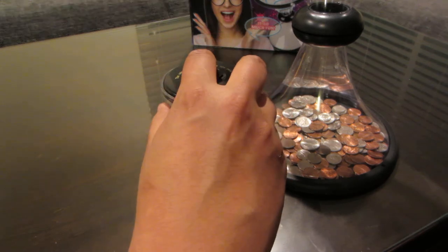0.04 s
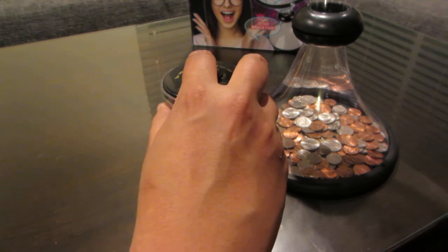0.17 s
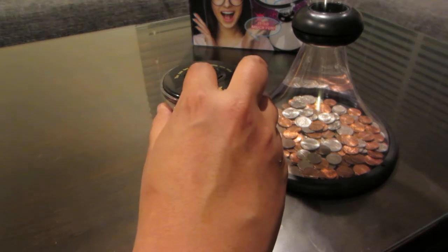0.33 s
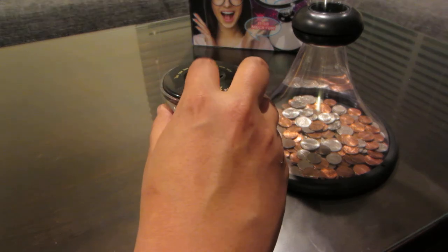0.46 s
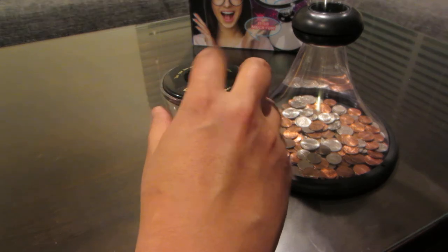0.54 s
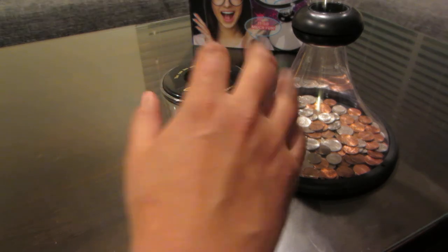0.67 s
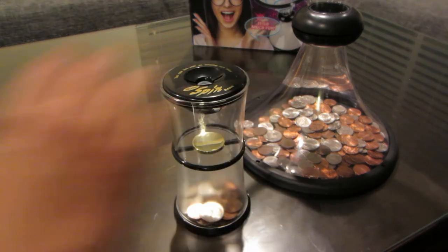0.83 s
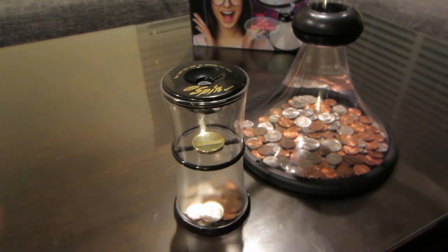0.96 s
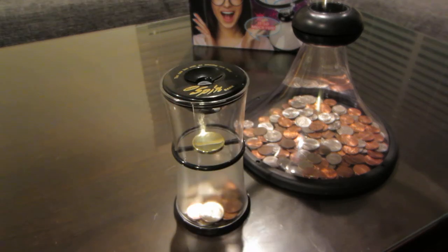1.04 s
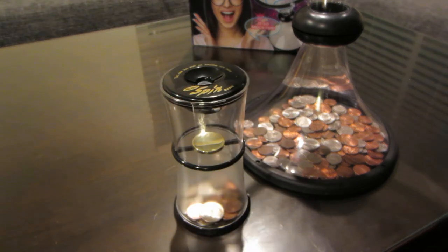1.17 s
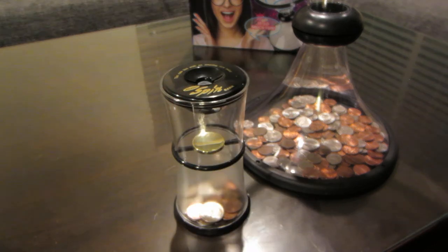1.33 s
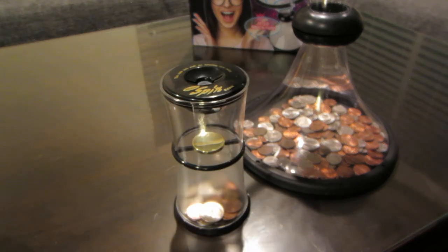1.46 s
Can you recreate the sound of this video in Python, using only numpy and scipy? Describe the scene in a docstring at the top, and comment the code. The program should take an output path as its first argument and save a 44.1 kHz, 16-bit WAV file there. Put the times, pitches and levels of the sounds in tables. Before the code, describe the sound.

A coin clacks through the tight slot of a small plastic bank. After a faint rub of a hand, sharp clacks, clinks, tiny squeaks and scrapes run from about 0.2 to 0.7 seconds, loudest between 0.3 and 0.5, with one soft table thump. The hand lets go near 0.6. From 1.2 to 1.5 seconds the spinning coin ticks faintly on the wall, over a low room hum.

```python
"""A table in a quiet, fairly live room. A coin is pressed through the lid of a small plastic bank.
It clacks on the shell, ringing its modes, clinks and stick-slip squeaks in the tight slot, and
scrapes along the plastic; one clack thumps the table. It spins on inside, ticking on the wall.
Behind: the hand rubbing and leaving the lid, room tone, hum and a short diffuse tail."""
import sys
import numpy as np
from scipy import signal
from scipy.fft import rfft, irfft, next_fast_len
from scipy.io import wavfile
from scipy.ndimage import map_coordinates

SR = 44100
rng = np.random.default_rng(int(sys.argv[2]) if len(sys.argv) > 2 else 0)


def persist_wave(psi):
    """Save psi, clipped to +-1, as 16-bit WAV."""
    counts = np.round(np.clip(psi, -1, 1) * 32767).astype(np.int16)
    wavfile.write(sys.argv[1], SR, np.atleast_2d(counts).T)


N = 66150
T = np.arange(N) / SR

# Coin blows on the shell: start_s, ring_db, tilt_db_per_octave, crack_db, knock_db, crack_t60_s
CLACK_HITS = [(.2296, -40, -11.5, -51, -37, 0.043), (0.2411, -33, -10, -32.5, -31.5, 0.058),
              (0.3058, -24, -2.5, -21.5, -50, 0.039), (0.3079, -14.5, -2, -10.5, -27, 0.011),
              (0.3097, -14, 1, -24, -25.5, 0.0055), (0.3181, -25.5, -4.5, -22, -27, 0.0086),
              (0.3719, -21.5, 0, -17, -45, .02), (0.3799, -17.5, 3.5, -19, -37, .016),
              (.3902, -26.5, -6, -27, -28.5, 0.026), (0.432, -21.5, 3.5, -26, -42.5, 0.0249),
              (0.4647, -25.5, -3.5, -21.5, -44, 0.018), (.4730, -17.5, -1, -12, -25, 0.014),
              (.4748, -23, 8.5, -10, -29, 0.0079), (0.4892, -21.5, 4, -37, -31.5, .0084),
              (.5717, -23.5, 3, -23.5, -28, 0.032), (0.5921, -22, 6.5, -24.5, -32.5, 0.029),
              (.6570, -28, -2.5, -32, -36.5, 0.014)]
# Coin edge on the slot: start_s, level_db
CLINK_HITS = [(0.369, -9), (.3798, -12.5), (.4316, -28.5), (0.474, -15.5)]
# Stick-slip bursts: start_s, length_s, pitch_hz, glide_percent, level_db, octave_db, roughness
SQUEAK_BURSTS = [(0.239, 0.017, 1325, -2.5, -25, -11, 0.34), (0.2559, 0.012, 1403, 3.5, -15, -14, 0.23),
                 (0.266, 0.0098, 2440, 2.5, -15.5, -23.5, 0.37), (.254, 0.022, 2160, 2.5, -27, -29.5, 0.83),
                 (.271, 0.013, 1452, -2.5, -29.5, -27.5, 0.1), (.284, .012, 1430, -0.5, -28, -31, .2),
                 (0.4722, 0.011, 1216, -0.5, -20, -15, 0.2), (0.54, 0.029, 1204, 2.5, -28.5, -18, 0.28),
                 (0.575, .026, 1190, 2.5, -26.5, -39, 0.3)]
# Coin sliding on plastic: start_s, length_s, level_db
SCRAPE_STROKES = [(0.255, 0.019, -22.5), (0.313, 0.012, -27.5), (0.391, 0.022, -32), (0.497, 0.035, -33),
                  (0.521, .075, -32), (0.599, 0.044, -36)]
# Spinning coin on the wall: start_s, hiss_db, ping_db, hiss_t60_s
TICK_GRAZES = [(1.177, -42, -50, 0.047), (1.191, -48.5, -50.5, 0.15), (1.274, -53.5, -51, 0.055),
               (1.286, -62, -49, 0.12), (1.316, -42, -44.5, 0.073), (1.3352, -36, -52, 0.049),
               (1.449, -52.5, -53, 0.21), (1.468, -53.5, -48, 0.28)]
# Modes of shell, hollow base, slot and wall: freq_hz, level_db, t60_s
SHELL_MODES = [(924, -7, 0.02), (1307, -7, 0.05), (1461, -5, 0.036), (1632, -0.5, 0.019),
               (2140, -0.5, 0.024), (2680, 1, 0.01), (2970, -4.5, 0.04), (3399, -5.5, 0.044),
               (4820, -8, 0.022), (6040, -6, 0.012)]
BASE_MODES = [(211, -10, 0.062), (420, -4.5, 0.024), (554, -1.5, .035), (883, -1, 0.032),
              (1138, 0.5, 0.034)]
SLOT_MODES = [(2545, -2.5, 0.015), (4817, -0.5, 0.012), (8200, -11.5, .007), (11000, -7, 0.0045)]
WALL_MODES = [(2364, -3, 0.044), (2528, 1, 0.064), (2710, -4, .05), (3300, -8, 0.035)]
# Noise spectra of coin, hand and room: freq_hz, density_db
CRACK_SPECTRUM = [(300, -21.5), (1200, -1), (2500, -0.5), (4100, -1), (5000, 0), (7000, -1), (9200, -5.5),
                  (13500, -10), (15700, -14)]
SCRAPE_SPECTRUM = [(35, -31), (200, -6), (600, -1), (1300, 0.5), (2600, 2), (4100, -4.5), (5200, -3),
                   (9500, -6), (13200, -17.5), (16000, -18)]
TICK_SPECTRUM = [(600, -8), (1800, 2.5), (3400, 3), (4400, -4.5), (6500, 3), (9000, -6.5), (13300, -17.5),
                 (16000, -14)]
RUB_SPECTRUM = [(100, -16), (350, 7), (600, -3), (2400, -14), (4000, -27), (14000, -35)]
LET_GO_SPECTRUM = [(70, -16), (160, -13), (245, 2.5), (340, -19), (600, -16), (1200, -30), (5000, -80)]
ROOM_TONE_SPECTRUM = [(25, -6), (90, -6.5), (135, -5), (190, -4.5), (310, -8), (850, -11.5), (1300, -16.5),
                      (5000, -29), (9300, -37), (16000, -45)]
# Hand shifting on the lid: time_s, level_db
RUB_ENVELOPE = [(0, -47), (.08, -52), (.16, -58.5), (.23, -49.5)]
# Room hum and faint whine: freq_hz, level_db
HUM_TONES = [(120, -64.5), (156, -65.5), (325, -69.5), (3435, -84)]
# Room decay: freq_hz, t60_s
TAIL_DECAY = [(150, 0.12), (600, 0.17), (2000, 0.328), (6000, 0.38), (10000, 0.19), (13000, 0.2754)]
# Room colour: freq_hz, gain_db
TAIL_COLOUR = [(100, 5.5), (220, 3), (500, 3.5), (1400, 2), (3000, -3.5), (7000, -5.5), (14000, -2)]
# Microphone treble dips: freq_hz, gain_db
MIC_RESPONSE = [(9500, -1), (10800, -7.5), (11800, -17.5), (13300, -3.5), (14800, -12.5), (15700, -10.5)]

STRIKE_ATTACK_S, SOFT_ATTACK_S = 0.000072, 0.002
STRIKE_DETUNE = 0.0017
LN_1000 = np.log(1000)  # 60 dB of decay


def clacks():
    """Each blow snaps, rings the shell, and adds a bright crack and a low knock through the base."""
    blows, impulses = np.zeros(N + SR), np.zeros(N)
    t = np.arange(SR // 10) / SR
    attack = 1 - np.exp(-t / STRIKE_ATTACK_S)
    crack = noise(CRACK_SPECTRUM)
    hz, mode_db, mode_t60_s = np.transpose(SHELL_MODES)[:, :, None]
    for start_s, ring_db, tilt_db, crack_db, knock_db, crack_t60_s in CLACK_HITS:
        spread, tune, polarity = rng.standard_normal((3, len(SHELL_MODES), 1))
        gain = np.sign(polarity) * amp(mode_db + tilt_db * np.log2(hz / hz.mean()) - 1.5 * spread)
        contact_t60_s = 3.14 * crack_t60_s  # a damped blow also shortens the ring
        decay = np.exp(-LN_1000 * t * (1 / mode_t60_s + 1 / contact_t60_s))
        modes = gain * decay * np.cos(2 * np.pi * hz * (1 + STRIKE_DETUNE * tune) * t)
        blows[round(start_s * SR):][:len(t)] += amp(ring_db) * modes.sum(0) * attack
        blows[:N] += amp(crack_db) * crack * fade(start_s, STRIKE_ATTACK_S, crack_t60_s)
        blows[:N] += amp(knock_db) * ring(BASE_MODES, start_s)
        impulses[round((start_s + STRIKE_ATTACK_S) * SR)] = amp(crack_db + 1)
    snaps = filtered(impulses, lambda hz: amp(along(CRACK_SPECTRUM, hz)))
    low_cut = signal.butter(2, 149, "high", fs=SR, output="sos")  # a small shell radiates little bass
    return signal.sosfilt(low_cut, blows[:N] + snaps)


def clinks():
    """The coin's edge strikes the slot and rings its modes."""
    return sum(amp(db) * ring(SLOT_MODES, start_s) for start_s, db in CLINK_HITS)


def squeaks():
    """Stick-slip in the slot: short gliding tones lock onto one resonance after another."""
    out = np.zeros(N)
    jitter, swell_db = 0.072 * wobble(rate_hz=600), 3 * wobble(rate_hz=250)
    for start_s, length_s, pitch_hz, glide_percent, db, octave_db, roughness in SQUEAK_BURSTS:
        glide = glide_percent / 100 * np.clip((T - start_s) / length_s, 0, 1)
        hz = pitch_hz * (1 + glide + roughness * jitter)
        phase = 2 * np.pi * np.cumsum(hz * (T > start_s)) / SR
        tone = np.sin(phase) + amp(octave_db) * np.sin(2 * phase)
        envelope = gate(start_s, length_s, attack_s=0.0022, release_s=0.006)
        out += np.sqrt(2) * amp(db + roughness * swell_db) * tone * envelope
    return out


def scrapes():
    """The coin's edge grinds over the plastic in dense grains."""
    envelope = sum(amp(db) * gate(start_s, length_s, attack_s=0.0011, release_s=0.008)
                   for start_s, length_s, db in SCRAPE_STROKES)
    grains = noise(SCRAPE_SPECTRUM) * amp(1.5 * wobble(rate_hz=700))
    return envelope * unit(grains)


def ticks():
    """The spinning coin grazes the wall: a puff of hiss and a small ping."""
    out, hiss = np.zeros(N), noise(TICK_SPECTRUM)
    for start_s, hiss_db, ping_db, hiss_t60_s in TICK_GRAZES:
        out += amp(hiss_db) * hiss * fade(start_s, SOFT_ATTACK_S, hiss_t60_s)
        out += amp(ping_db) * ring(WALL_MODES, start_s, detune=0.023)  # a new spot each graze
    return out


def table_thump(start_s=0.473, pitch_hz=86, level_db=-40):
    """The table top answers a heavy clack with one low, damped tone."""
    tone = np.sin(2 * np.pi * pitch_hz * (T - start_s))
    return amp(level_db) * tone * fade(start_s, SOFT_ATTACK_S, t60_s=0.21)


def hand():
    """The hand rubs softly on the lid, then lets go with a dull puff."""
    time_s, db = np.transpose(RUB_ENVELOPE)
    rub = np.interp(T, time_s, amp(db), right=0) * noise(RUB_SPECTRUM)
    let_go = amp(-38) * noise(LET_GO_SPECTRUM) * fade(start_s=0.61, attack_s=0.017, t60_s=0.34)
    return rub + let_go


def room_tail(x, delay_s=0.0043, build_s=0.0034, hop_s=0.1):
    """Diffuse reverberation, redrawn every hop; each frequency decays at its own rate."""
    out, hop = np.zeros(2 * N), round(hop_s * SR)
    hz, t, _ = signal.stft(np.zeros(SR // 2), SR, nperseg=256)
    decay = np.exp(-LN_1000 * t / along(TAIL_DECAY, hz)[:, None])
    colour = amp(along(TAIL_COLOUR, hz))[:, None]
    for start in range(0, N, hop):
        white = signal.stft(rng.standard_normal(SR // 2), SR, nperseg=256)[2]
        tail = signal.istft(white * decay * colour, SR, nperseg=256)[1]
        tail *= np.clip((T[:len(tail)] - delay_s) / build_s, 0, 1)
        piece = x[start:start + 2 * hop]
        window = np.sin(np.pi * np.arange(len(piece)) / (2 * hop))
        wet = signal.fftconvolve(piece * window, tail / np.linalg.norm(tail))
        out[start:start + len(wet)] += wet
    return out[:N]


def room_tone(waver_db=4, floor_db=-53.5):
    """Low noise under a hum and a faint whine that waver in level."""
    hum = sum(np.sqrt(2) * amp(db + waver_db * wobble(rate_hz=5.75)) * np.sin(2 * np.pi * hz * T)
              for hz, db in HUM_TONES)
    return hum + amp(floor_db) * noise(ROOM_TONE_SPECTRUM)


def ring(modes, start_s, detune=STRIKE_DETUNE):
    """Struck modes; level, polarity and tuning vary per blow."""
    out = np.zeros(N)
    spread, polarity, tune = rng.standard_normal((3, len(modes)))
    for k, (hz, db, t60_s) in enumerate(modes):
        gain = np.sign(polarity[k]) * amp(db + 0.5 * spread[k])
        tone = np.sin(2 * np.pi * hz * (1 + detune * tune[k]) * (T - start_s))
        out += gain * tone * fade(start_s, STRIKE_ATTACK_S, t60_s)
    return out


def amp(db):
    """Decibels to gain."""
    return 10 ** (np.asarray(db) / 20)


def unit(x):
    """Scale to rms 1."""
    return x / np.sqrt(np.mean(x ** 2) + 1e-20)


def along(points, hz):
    """Interpolate freq_hz, value points on a log axis."""
    knots_hz, values = np.transpose(points)
    return np.interp(np.log(hz + 1), np.log(knots_hz + 1), values)


def filtered(x, response):
    """Zero-phase filter with gain response(hz)."""
    size = next_fast_len(N + SR // 4)
    return irfft(rfft(x, size) * response(np.fft.rfftfreq(size, 1 / SR)), size)[:N]


def noise(spectrum):
    """Coloured noise, rms 1."""
    return unit(filtered(rng.standard_normal(N), lambda hz: amp(along(spectrum, hz))))


def wobble(rate_hz):
    """Smooth curve through random knots."""
    return map_coordinates(rng.standard_normal(4096), [T * rate_hz], mode="wrap")


def fade(start_s, attack_s, t60_s):
    """Quick rise, exponential decay."""
    t = np.maximum(T - start_s, 0)
    return (1 - np.exp(-t / attack_s)) * np.exp(-np.minimum(LN_1000 * t / t60_s, 50))


def gate(start_s, length_s, attack_s, release_s):
    """Linear attack, hold, linear release."""
    rise = np.clip((T - start_s) / attack_s, 0, 1)
    return rise * np.clip((start_s + length_s - T) / release_s + 0.5, 0, 1)


def scene():
    """Mono mix of coin, table, hand and room."""
    rattle = clacks() + clinks() + scrapes() + ticks()
    squeal = squeaks()
    send = amp(-7) * rattle + amp(-13) * squeal  # the slot faces the microphone: drier squeaks
    return (rattle + squeal + table_thump() + room_tail(send) + hand() + room_tone())[None]


def record(dry):
    """Microphone: treble dips and a hard band limit."""
    top_hz = 16100
    return filtered(dry[0], lambda hz: amp(along(MIC_RESPONSE, hz)) * (hz < top_hz))[None]


dry = scene()
out = record(dry)
persist_wave(out)
```